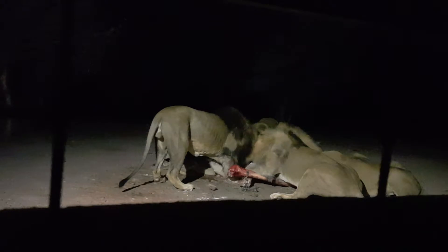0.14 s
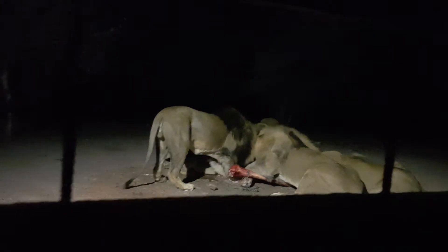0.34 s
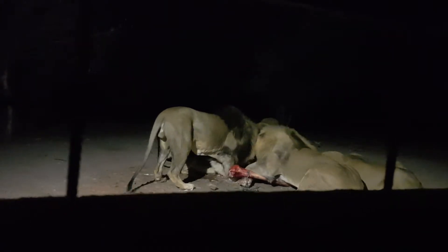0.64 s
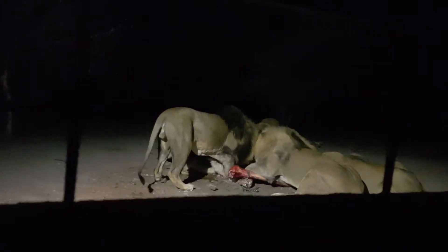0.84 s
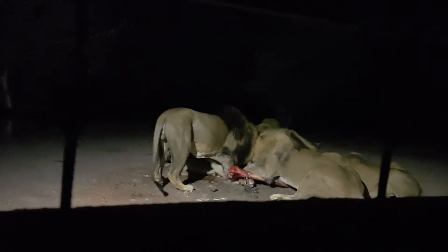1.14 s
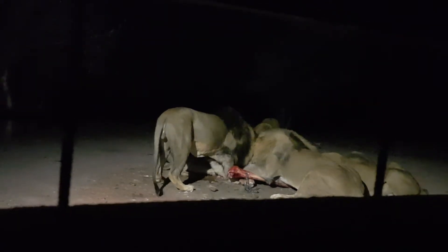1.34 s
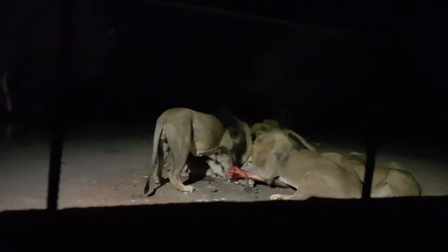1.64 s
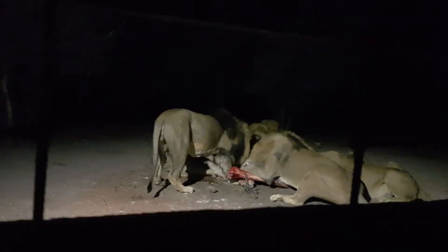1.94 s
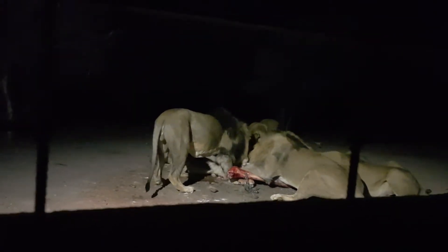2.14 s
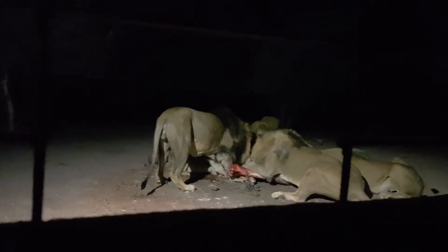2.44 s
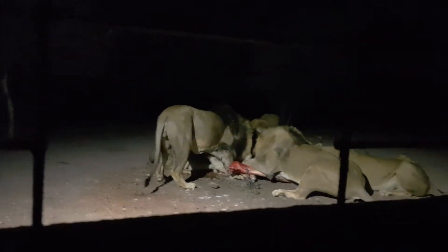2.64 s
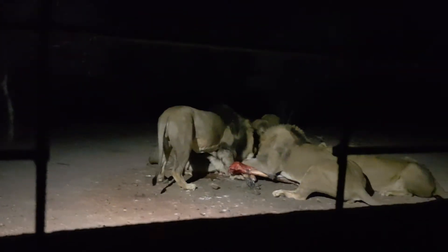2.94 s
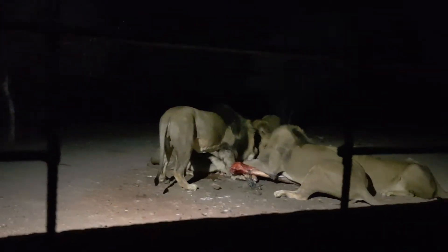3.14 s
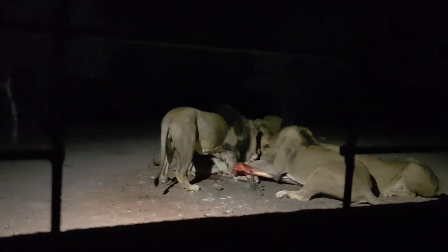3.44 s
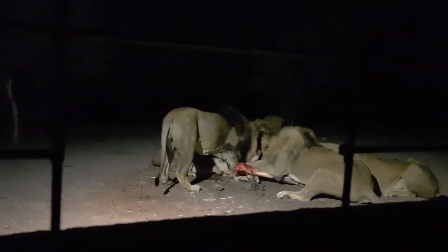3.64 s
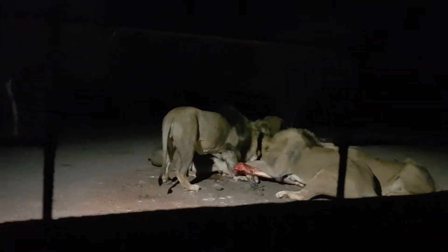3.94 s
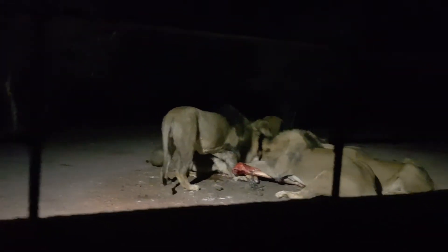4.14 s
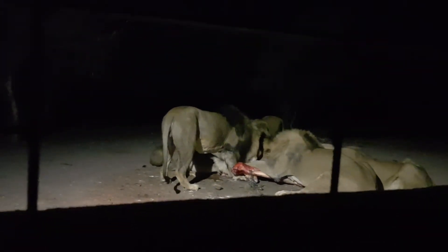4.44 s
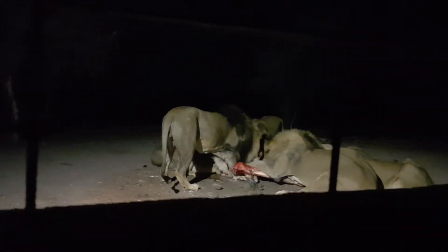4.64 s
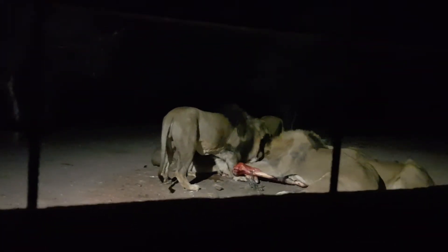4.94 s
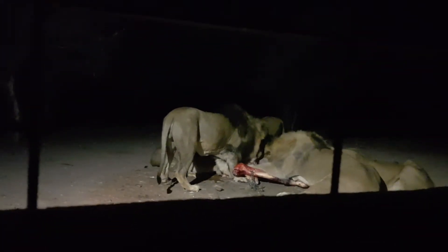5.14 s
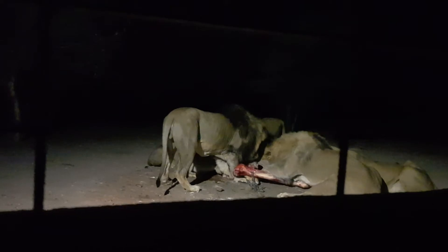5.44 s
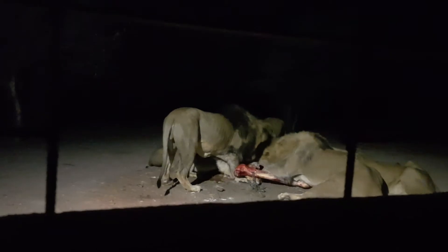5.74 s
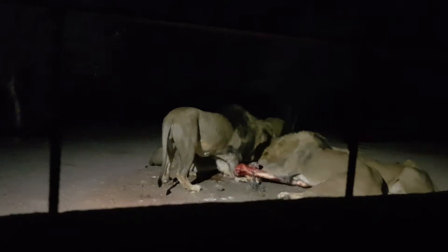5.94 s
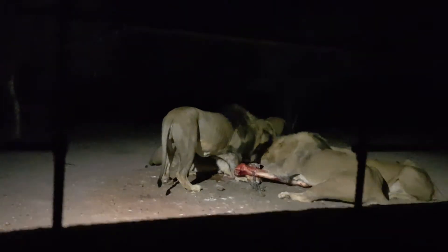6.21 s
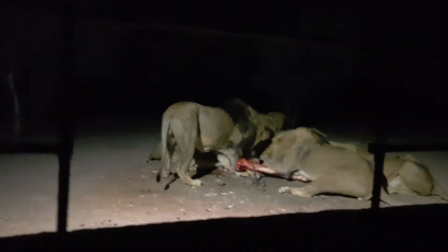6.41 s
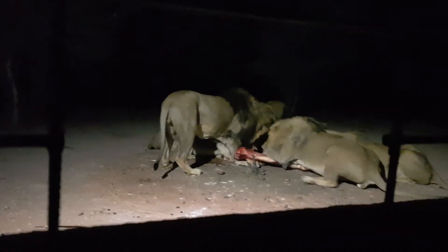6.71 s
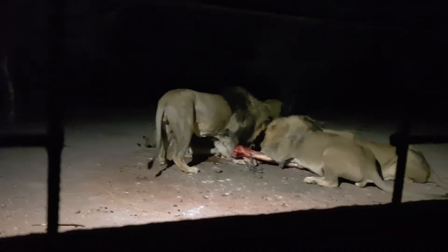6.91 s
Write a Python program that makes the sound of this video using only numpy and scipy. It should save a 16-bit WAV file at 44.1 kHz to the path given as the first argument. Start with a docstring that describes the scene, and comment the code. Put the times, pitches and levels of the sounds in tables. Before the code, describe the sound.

Lions feed at close range outdoors at night, heard in stereo from an open vehicle with short dull reflections and a faint tail. A low fluttering growl around 115 hertz runs throughout in uneven pushes, over very quiet dark air. A rattling snarl of about forty pulses a second swells at once, peaks near 0.4 seconds and fades by 0.6. Low grumbling follows, with a rougher snarl from 1.4 to 2. A faint crack at 2.2 precedes short grunts and a raspy snarl around 2.5 to 3, with gritty scraping. A tiny crack at 3.4 leads to a strong, abrupt snarl at 3.6 to 3.9. Growling subsides, then a long snarl builds from 4.6 to a climax at 5.6. A brief one follows at 5.9. From 6.3 to 6.9, explosive grunts, overlapping snarls, strong hissing and a sharp bone crunch cluster together, then settle to the end.

```python
"""Lions feeding at night

Lions feed on a carcass beside an open vehicle: a deep growl booms throughout while slow voice pulses
rattle through throat resonances as snarls, with grunts as puffs of noise and moans as gliding resonances.
Air hisses between the teeth, paws and meat scrape over grit in clumps of grains, and bones crack with a
thin ring. The vehicle adds short dull echoes and scatter to the voices, over a low bed of still night air."""
import sys
import numpy as np
from scipy import signal
from scipy.fft import rfft, irfft, next_fast_len
from scipy.io import wavfile
from scipy.ndimage import uniform_filter1d

SR = 44100
rng = np.random.default_rng(int(sys.argv[2]) if len(sys.argv) > 2 else 0)


def int16_out(signal):
    """Quantize to a 16-bit WAV file."""
    q = np.round(np.clip(np.atleast_2d(signal).T, -1, 1) * 32767)
    wavfile.write(sys.argv[1], SR, q.astype(np.int16))


N = 311787
T = np.arange(N) / SR


def amp(db):
    """Gain factor for a level in dB."""
    return 10 ** (np.asarray(db) / 20)


def unit(x):
    """Scale to an overall RMS of 1."""
    return x / np.sqrt(np.mean(x ** 2) + 1e-20)


def add(mix, start, sound):
    """Lay a sound into the mix at a start in seconds, cut at the end of the mix."""
    part = mix[max(round(start * SR), 0):][:len(sound)]
    part += sound[:len(part)]


def colour(x, points):
    """Causal minimum-phase filter with the given (Hz, dB) outline."""
    hz, db = np.transpose(points)
    bins_hz = abs(np.fft.fftfreq(16384, 1 / SR))
    log_gain = np.log(amp(np.interp(np.log(bins_hz + 1), np.log(hz), db)))
    taps = np.fft.ifft(np.exp(np.conj(signal.hilbert(log_gain)))).real[:4096]
    return signal.oaconvolve(x, taps)[:len(x)]


def resonate(x, hz, width):
    """Steep-sided resonance of gain 1 that can follow a frequency curve: shift to 0 Hz, smooth, shift back."""
    turn = np.exp(2j * np.pi * np.cumsum(hz * np.ones(len(x))) / SR)
    r = np.exp(-2 * np.pi * width / SR)
    smoothed = signal.lfilter([(1 - r) ** 2], [1, -2 * r, r * r], x / turn)
    return 2 * (turn * smoothed).real


def wander(hz, size=N):
    """Smooth chance of RMS 1, up to about hz changes a second."""
    n = next_fast_len(size + SR, True)
    smoothing = np.exp(-(np.fft.rfftfreq(n, 1 / SR) / hz) ** 2)
    return unit(irfft(rfft(rng.standard_normal(n)) * smoothing, n))[:size]


def steady(x, span):
    """Level 1 over every span of seconds, with the faster flutter left in."""
    window = np.hanning(int(span * SR))
    power = abs(signal.fftconvolve(x * x, window / window.sum(), "same"))
    return x / np.sqrt(power + 1e-4 * np.mean(x * x))


def swells(rows, rest_db, attack, release, arch_db):
    """Gain of a source that idles at rest_db and, for each row, rises, arches over and falls back."""
    t = T[::64]
    power = amp(rest_db) ** 2
    for start, end, db in rows:
        rise = (1 + np.tanh((t - start) / attack)) / 2
        fall = (1 + np.tanh((end - t) / release)) / 2
        off_centre = np.interp(t, [start, end], [-1, 1])
        arch = amp(db - max(arch_db, 0) * off_centre ** 2)
        power = power + (arch * rise * fall) ** 2
    return np.interp(T, t, np.sqrt(power))


def spread(make, likeness):
    """Two ears share part of a scattered sound; likeness is the shared portion of the power."""
    shared, c = unit(make()), np.clip(likeness, 0, 1)
    return np.array([np.sqrt(c) * shared + np.sqrt(1 - c) * unit(make()) for ear in range(2)])


PATCH_DB, PATCH_HZ, PATCH_S = 2, 350, .07  # depth of the colour shifts, and size of the smoothing patches


def drifting(x):
    """The colour of a hiss or scrape shifts in short patches of time and pitch, alike in both ears."""
    hz, t, z = signal.stft(x, SR, nperseg=512)
    field = rng.standard_normal(z.shape[1:])
    for _ in range(2):
        field = uniform_filter1d(field, round(PATCH_HZ / hz[1]), axis=0)
        field = uniform_filter1d(field, round(PATCH_S / t[1]), axis=1)
    patched = z * amp(PATCH_DB * unit(field))
    return unit(signal.istft(patched, SR, nperseg=512)[1][:, :N])


def folds(rate, jitter, breathiness, puff=0.33, slap_share=0.13, puff_rise=0.007):
    """Slack vocal folds slap open with a short puff of air; breath leaks between the puffs."""
    n = len(rate)
    turns = np.cumsum(rate * (1 + jitter * wander(39.97, n))) / SR
    slaps = unit(np.diff(np.floor(turns - puff_rise), prepend=-1))  # the slap lands as the puff peaks
    cycle = turns % 1  # puff and puff_rise are shares of this cycle
    puff_shape = (1 - np.exp(-cycle / puff_rise)) * np.exp(-cycle / puff)
    puffs = unit(puff_shape * rng.standard_normal(n))
    slap, leak = np.clip(slap_share, 0, 1), np.clip(breathiness, 0, 1)
    pulses = np.sqrt(slap) * slaps + np.sqrt(1 - slap) * puffs
    uneven = amp((2.5 + 10 * jitter) * wander(24, n))  # irregular cycles also differ in strength
    return (np.sqrt(1 - leak) * pulses + np.sqrt(leak) * rng.standard_normal(n)) * uneven


# Pushes of the closed-mouth growl. Each row: start in seconds, end in seconds, effort in dB.
GROWL_PUSHES = [(.26, .56, -21), (.87, 1.16, -22), (1.5, 1.69, -18.5), (1.84, 2.05, -16.5),
                (2.22, 2.42, -17), (2.63, 3.03, -18.5), (2.75, 2.86, -11), (3.42, 3.52, -15),
                (3.72, 4.02, -16), (4.09, 4.23, -15.5), (4.42, 4.7, -22), (4.84, 5.22, -20.5),
                (5.23, 5.68, -17.5), (6.55, 6.92, -17)]
# Groans, where the growl turns ragged and chesty. Each row: start in seconds, end in seconds, level in dB.
GROANS = [(.295, .41, -6.5), (.91, 1.15, -26), (2.12, 2.33, -20), (3.56, 3.77, -17), (4.08, 4.26, -22.5),
          (4.84, 5.23, -18), (5.73, 5.82, -23), (5.9, 6.04, -17.5), (6.57, 6.86, -19.5)]
# Tone of the ragged pulses in the chest. Each row: frequency in Hz, gain in dB.
CHEST_TONE = [(90, -36), (140, -0.5), (176, 1), (215, -15.5), (260, -17.5), (430, -22), (650, -34),
              (8000, -84.5)]
# Tone of the slower pulses below the boom. Each row: frequency in Hz, gain in dB.
BELLY_TONE = [(18, -35), (48, -13), (88, 14.5), (115, 15.5), (400, -53.5)]
# The chest falls quiet around the start of the long snarl: start in seconds, end in seconds, change in dB.
CHEST_LULL = (4.5, 4.8, -15)
GROWL_REST_DB, GROWL_ATTACK_S, GROWL_RELEASE_S = -28.5, 0.013, 0.049  # the growl idles between pushes
GROAN_REST_DB, GROAN_ATTACK_S, GROAN_RELEASE_S = -28.5, 0.032, 0.093
BOOM_HZ, BOOM_HZ_PER_DB = 114.57, 0.28  # pitch at rest, and the rise with effort
FLUTTER, FLUTTER_DB_PER_DB = 0.6, -0.74  # depth at rest; the boom steadies as effort rises


def deep_growl():
    """A closed-mouth growl: a fluttering boom that rises in pitch with effort, plus ragged fold pulses."""
    boom_db = 20 * np.log10(swells(GROWL_PUSHES, GROWL_REST_DB, GROWL_ATTACK_S, GROWL_RELEASE_S, arch_db=1.5))
    effort_db = boom_db - GROWL_REST_DB
    groan = swells(GROANS, GROAN_REST_DB, GROAN_ATTACK_S, GROAN_RELEASE_S, arch_db=1.5)
    lull_start, lull_end, lull_db = CHEST_LULL
    lull = (np.tanh((T - lull_start) / GROAN_ATTACK_S) + np.tanh((lull_end - T) / GROAN_ATTACK_S)) / 2
    groan = groan * amp(lull_db * lull)
    hz = BOOM_HZ + BOOM_HZ_PER_DB * effort_db
    turn = np.exp(2j * np.pi * np.cumsum(hz) / SR)
    flutter = FLUTTER * amp(FLUTTER_DB_PER_DB * effort_db)
    boom = steady((turn * (1 + flutter * (wander(14.5) + 1j * wander(49)))).real, 0.23)
    # the folds pulse at a half and a third of the boom's pitch
    chest = steady(colour(folds(hz / 2, .12, 0.59), CHEST_TONE), 0.17)
    belly = steady(colour(folds(hz / 3, 0.14, 0.71), BELLY_TONE), 0.45)
    return amp(boom_db - 3.5) * boom + groan * chest + amp(0.29 * boom_db - 23.5) * belly


# Tone of the still air. Each row: frequency in Hz, gain in dB.
NIGHT_TONE = [(25, -1.5), (110, 10.5), (2000, -34.5), (15000, -65)]


def night_air():
    """Still night air: a low, steady bed of filtered noise, partly shared between the ears."""
    return amp(-41.5) * spread(lambda: colour(rng.standard_normal(N), NIGHT_TONE), 0.58)


AIR_ARCH_DB = 5  # hisses and scrapes are this much weaker at their ends than mid-way
# Hisses of air through the teeth. Each row: start in seconds, end in seconds, level in dB before the trim.
HISSES = [(.02, .47, -42), (.56, .81, -43.5), (1.0, 1.24, -45.5), (1.47, 1.8, -36), (1.87, 2.6, -44),
          (2.67, 3.05, -40), (3.1, 3.7, -42), (4.16, 4.44, -43.5), (4.74, 5.55, -43.5), (5.92, 6.25, -44.5),
          (6.31, 6.54, -38), (6.55, 6.82, -31), (6.82, 7.1, -38)]
# Tone of the hissing air. Each row: frequency in Hz, gain in dB.
HISS_TONE = [(200, -40), (800, -1), (1500, -0.5), (2400, 0), (3300, -10), (4600, -13.5), (8000, -21),
             (16000, -32.5)]
HISS_REST_DB, HISS_ATTACK_S, HISS_RELEASE_S = -50.5, .045, 0.043


def hisses():
    """Air hisses past the teeth: fluttering turbulence noise that swells and sinks."""
    flutter = amp(1.5 * wander(90))
    hiss = drifting(spread(lambda: colour(rng.standard_normal(N) * flutter, HISS_TONE), 0.19))
    return amp(-4.5) * swells(HISSES, HISS_REST_DB, HISS_ATTACK_S, HISS_RELEASE_S, AIR_ARCH_DB) * hiss


# Broad colour of the voice. Each row: frequency in Hz, gain in dB.
FLESH_TONE = [(170, -25), (320, 9), (500, 13.5), (680, -20.5), (1300, -25), (1800, -41), (6000, -77),
              (16000, -90.5)]
# Spray of each pulse past the teeth. Each row: frequency in Hz, gain in dB.
SPRAY_TONE = [(600, -24.5), (1600, -6.5), (2300, -1.5), (3400, -2.5), (4500, -20), (8000, -24.5),
              (16000, -51.5)]
# Throat resonances. Each row: multiple of the second throat resonance, width in Hz, level in dB.
THROAT_MODES = [(1, 84.8, -4), (1.25, 90.5, -14)]
# Resonances at the teeth. Each row: multiple of the lip resonance, width in Hz, level in dB.
TEETH_MODES = [(1.95, 188.5, -18), (2.62, 140.5, -16.5)]
# Share of clean slap in each pulse. Rows: deep in the throat, in the jaws, at the teeth (each 0-1).
SLAP_SHARES = np.array([[.65], [.5], [.1]])
# Snarls. Each row: start, climax and end in seconds, climax level in dB, build-up to it in dB,
# pulses per second at start, middle and end, jitter (0-1), extra breathiness at the start (0-1),
# first and second throat resonance in Hz (the second at average effort),
# brightness in dB at average effort, rasp of the teeth in dB.
SNARLS = [(0.045, 0.35, 0.6, -19, 13, 40, 45.53, 47, 0.011, 0.21, 368, 641, -0.5, -11),
          (1.444, 1.59, 1.96, -25.5, 8.5, 44.7, 37.94, 43.4, 0.17, 0.28, 343, 780, -3, -15),
          (2.516, 2.915, 2.98, -29.5, -3, 39.98, 39.28, 35.24, 0.052, 0.54, 575, 990, -3, -8.5),
          (3.569, 3.667, 3.9, -13, 7, 41.14, 48.02, 48.2, 0.0076, 0.19, 423, 1010, -7.5, -2.5),
          (4.632, 5.624, 5.795, -18, 10.5, 38.72, 42.44, 36.04, 0.0023, 0.029, 431, 1090, -10, -8.5),
          (5.871, 5.968, 6.25, -25, 1, 37.9, 46.04, 45.8, 0.029, .2, 300, 602, 0, -8.5),
          (6.255, 6.402, 7.6, -25.5, 2, 52.1, 49.92, 45, .25, 0.33, 484, 690, -6.5, -12),
          (6.585, 6.775, 6.93, -21.5, 6.5, 53.8, 36, 36.5, 0.0067, .03, 435, 670, 0.5, -2.5)]
# a snarl catches, builds ever faster, then dies away
SNARL_ATTACK_S, BUILD_CURVE, RELEASE_DB, RELEASE_CURVE = 0.037, 1.7, 30, 0.93
SNARL_LEAK, SNARL_PUFF, SNARL_PUFF_RISE = .015, .19, .1  # least breathiness; puff times in pulse cycles
PUFF_EFFORT_DB, PUFF_SHRINK = -22, .45  # effort where SNARL_PUFF holds; dB of shortening per dB of effort
FIRST_WIDTH_HZ = 83  # width of the first throat resonance
LIP_LIFT, LIP_SETTLE_S = .25, .055  # the teeth ring higher as the lips first draw back
BRIGHTEN_DB_PER_DB = .28  # the upper resonances gain on the first as the jaws open


def snarls():
    """Breath tightens into slow pulses rattling the throat; with effort the jaws open, brighter and higher."""
    out = np.zeros(N)
    for (start, climax, end, db, build_db, *rates, jitter, breathiness,
         low_hz, high_hz, bright_db, teeth_db) in SNARLS:
        t = np.arange(start, end, 1 / SR)
        built = np.interp(t, [start, climax], [0, 1])
        spent = np.interp(t, [climax, end], [0, 1])
        effort_db = db - build_db * (1 - built ** BUILD_CURVE) - RELEASE_DB * spent ** RELEASE_CURVE
        opening = effort_db - effort_db.mean()
        # soft puffs run together, forceful ones stand apart
        puff = SNARL_PUFF * amp(PUFF_SHRINK * (PUFF_EFFORT_DB - effort_db))
        rate = np.interp(t, np.linspace(start, end, len(rates)), rates)
        breath = SNARL_LEAK + breathiness * (1 - built ** 2)
        deep, oral, spray = folds(rate, jitter, breath, puff, SLAP_SHARES, SNARL_PUFF_RISE)
        jaws_hz = high_hz * (1 + 0.0038 * opening)
        lips_hz = high_hz * (1 + LIP_LIFT * np.exp((start - t) / LIP_SETTLE_S))
        throat = sum(amp(mode_db) * resonate(oral, k * jaws_hz, width) for k, width, mode_db in THROAT_MODES)
        teeth = sum(amp(mode_db) * resonate(spray, k * lips_hz, width) for k, width, mode_db in TEETH_MODES)
        upper = throat + amp(teeth_db) * (teeth + amp(-29.5) * colour(spray, SPRAY_TONE))
        voice = resonate(deep, low_hz, FIRST_WIDTH_HZ)
        voice = voice + amp(bright_db + BRIGHTEN_DB_PER_DB * opening) * upper
        voice = voice + amp(-14) * colour(oral, FLESH_TONE)
        edges = np.clip(np.minimum(t - start, end - t) / SNARL_ATTACK_S, 0, 1)
        add(out, start, amp(effort_db - 2.0) * steady(voice, 0.06) * edges)
    return out


# Sudden grunts. Each row: start in seconds, peak in dB, lower resonance in Hz, decay time in seconds.
GRUNTS = [(0.213, -26.5, 1320, 0.012), (1.746, -20.5, 810, 0.013), (2.542, -20.5, 655, 0.0063),
          (2.663, -17, 590, 0.012), (6.311, -12, 520, 0.025), (6.384, -14, 580, 0.028),
          (6.767, -13.5, 675, 0.0024)]


def grunts():
    """Single explosive puffs through two broad throat resonances, with a little spray past the teeth."""
    out, t = np.zeros(N), np.arange(SR // 5) / SR
    for start, db, hz, length in GRUNTS:
        puff = rng.standard_normal(len(t)) * np.exp(-t / length) * np.minimum(t / .002, 1)
        throat = resonate(puff, hz, 240) + amp(-17) * resonate(puff, 2 * hz, 300)
        voice = colour(puff, FLESH_TONE) + amp(11.0) * throat + amp(-27) * colour(puff, SPRAY_TONE)
        add(out, start, amp(db) * voice / abs(voice).max())
    return out


# Soft moans and rasping hisses, each one gliding mouth resonance. Each row: start in seconds,
# end in seconds, first resonance in Hz, last resonance in Hz, width in Hz, level in dB.
MOANS = [(0.301, 0.505, 600, 660, 40, -31), (0.24, 0.44, 1150, 950, 320, -43),
         (0.294, 0.385, 3130, 3700, 450, -50.5), (.89, 1.08, 181.2, 176, 5.8, -24),
         (2.117, 2.324, 318, 243, 49, -32), (2.805, 3.014, 2420, 2500, 480, -45),
         (3.787, 4.107, 847, 754, 54, -47.5), (4.078, 4.387, 2440, 2420, 290, -49),
         (4.134, 4.463, 5795, 5850, 280, -61.5), (4.507, 4.662, 2540, 2200, 110, -58),
         (6.094, 6.141, 2380, 1936, 1200, -47), (6.298, 6.438, 1600, 1500, 110, -44),
         (3.66, 3.81, 470, 420, 55, -24), (6.455, 6.495, 1420, 1380, 130, -36)]


def moans():
    """Breathy voice through one narrow resonance that glides as the mouth moves."""
    out = np.zeros(N)
    for start, end, first_hz, last_hz, width, db in MOANS:
        n = int((end - start) * SR)
        voice = folds(np.full(n, 55), 0.18, 0.13)  # 55 pulses per second
        tone = resonate(voice, np.linspace(first_hz, last_hz, n), width)
        add(out, start, amp(db) * unit(tone) * signal.windows.tukey(n))
    return out


# Paws and meat dragged over the ground. Each row: start in seconds, end in seconds, level in dB.
SCRAPES = [(.29, .84, -50), (2.68, 3.15, -49.5), (3.1, 3.98, -57), (4.17, 4.52, -53)]
# Tone of the grit. Each row: frequency in Hz, gain in dB.
GRIT_TONE = [(300, -7), (1500, -7), (3600, 1.5), (5000, -5), (8000, -5), (9500, -11.5), (12300, -9.5),
             (15500, -22.5)]
SCRAPE_REST_DB, SCRAPE_ATTACK_S, SCRAPE_RELEASE_S = -66, .05, 0.046
CRUMBLE_RISE_S, CRUMBLE_DB_PER_S = 0.0068, 48.5  # onset time and fade of the crumbling


def grit():
    """Grit crunches in clumps of tiny chance grains, under each scrape and after each crack."""
    clumps = amp(1.5 * wander(90))
    sizes = amp(2.8 * np.minimum(rng.exponential(1, N), 4.5))
    grains = (rng.random(N) < 6000 / SR) * sizes  # about 6000 grains a second
    crunch = drifting(spread(lambda: colour(rng.standard_normal(N) * grains * clumps, GRIT_TONE), 0.15))
    scraping = swells(SCRAPES, SCRAPE_REST_DB, SCRAPE_ATTACK_S, SCRAPE_RELEASE_S, AIR_ARCH_DB)
    crumbling = np.zeros(N)
    for start, *_, db in CRACKS:
        onset = (1 + np.tanh((T - start) / CRUMBLE_RISE_S)) / 2
        crumbling += onset * amp(db - CRUMBLE_DB_PER_S * abs(T - start))
    return np.hypot(scraping, crumbling) * crunch


# Tone of the splintering. Each row: frequency in Hz, gain in dB.
SPLINTER_TONE = [(800, -34), (3000, 13.0), (9000, 12.5), (15000, -3.5)]
# Cracks of bone and stone. Each row: start in seconds, burst peak in dB, ring in Hz, ring in dB
# relative to the burst, burst decay time in seconds, level in dB of the crumbling afterwards.
CRACKS = [(2.164, -39.5, 11600, -6, 0.028, -51.5), (3.379, -35, 8340, -15, 0.0024, -60),
          (5.244, -39.5, 7540, -21, 0.033, -60), (6.552, -29, 7900, -6.5, 0.011, -35.5)]


def cracks():
    """A burst of splintering noise with a short thin ring."""
    out, t = np.zeros(N), np.arange(SR // 4) / SR
    for start, db, hz, ring_db, length, _ in CRACKS:
        burst = colour(rng.standard_normal(len(t)) * np.exp(-t / length), SPLINTER_TONE)
        ring = amp(ring_db) * np.sin(2 * np.pi * hz * t) * np.exp(-t / .014)
        add(out, start, amp(db) * (burst / abs(burst).max() + ring))
    return out


# Echoes from roof and sides. Each row: delay in seconds, level in dB.
PANELS = [(.0095, -22), (0.0163, -8)]
# The panels return mostly bass. Each row: frequency in Hz, gain in dB.
PANEL_TONE = [(550, 0), (1100, -9)]
# Strength of the scattered sound. Each row: frequency in Hz, gain in dB.
SCATTER_TONE = [(160, -20.5), (480, -0.5), (900, 2)]
TAIL_DB = -8  # level of the outdoor tail


def vehicle(x, side_db, decay, tail_delay=.02, tail_decay=0.046, ear_gap=0.00027):
    """Direct sound, dull slanting panel echoes, early scatter from the sides and a faint outdoor tail."""
    t = np.arange(SR // 3) / SR
    fades = [np.exp(-t / decay), (t > tail_delay) * np.exp(-t / tail_decay)]
    early, late = rng.standard_normal((2, len(t))) * fades
    side, tail = (colour(signal.oaconvolve(x, taps / np.linalg.norm(taps))[:N], SCATTER_TONE)
                  for taps in (early, late))
    dull, ears = colour(x, PANEL_TONE), []
    # panel echoes reach the right ear later; the side scatter has opposite signs in the two ears
    for lag, sign in ((0, 1), (ear_gap, -1)):
        echoes = sum(amp(db) * np.interp(T - delay - lag, T, dull, left=0) for delay, db in PANELS)
        ears.append(x + echoes + amp(TAIL_DB) * tail + sign * amp(side_db) * side)
    return np.array(ears)


# The bass sits to the left. Each row: frequency in Hz, extra gain of the left ear in dB.
LEFT_LEAD = [(330, 1.77), (550, 0.2)]


def scene():
    """Voices echo off the vehicle; feeding noises and the still night lie around them."""
    lions = amp(-2.0) * deep_growl() + snarls() + moans() + grunts()
    voices = vehicle(lions, side_db=-5.0, decay=0.038)
    left, right = amp(-0.67) * (voices + hisses() + grit() + cracks())
    return np.array([colour(left, LEFT_LEAD), right]) + night_air()


EDGE_HZ = 15750


def record(dry):
    """The recorder's band limit: a steep low-pass at EDGE_HZ."""
    taps = signal.firwin(511, EDGE_HZ, window=("kaiser", 9), fs=SR)
    return signal.oaconvolve(dry, taps[None], "same")


dry = scene()
out = record(dry)
int16_out(out)
```